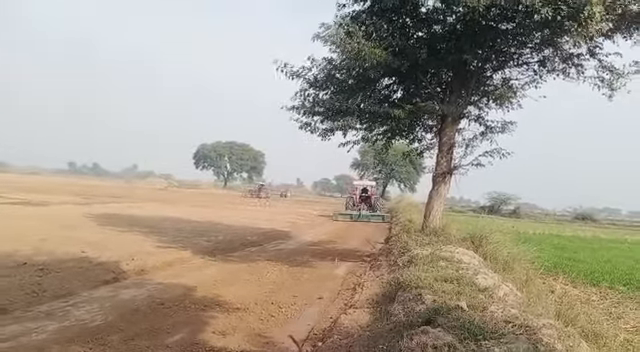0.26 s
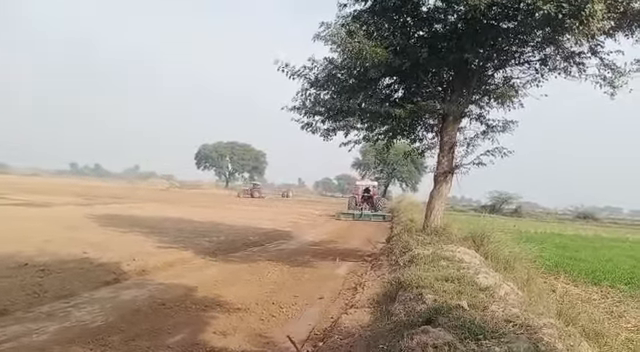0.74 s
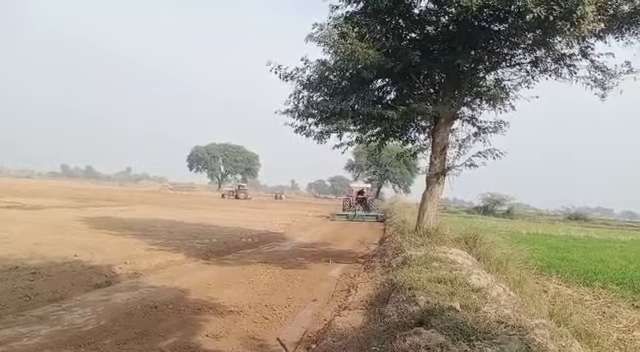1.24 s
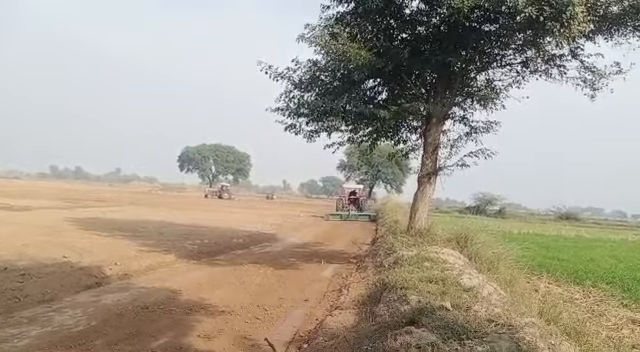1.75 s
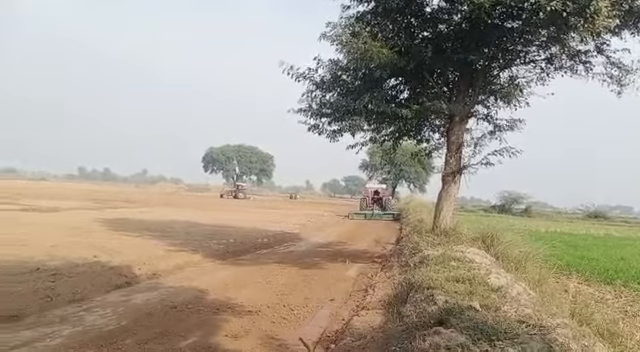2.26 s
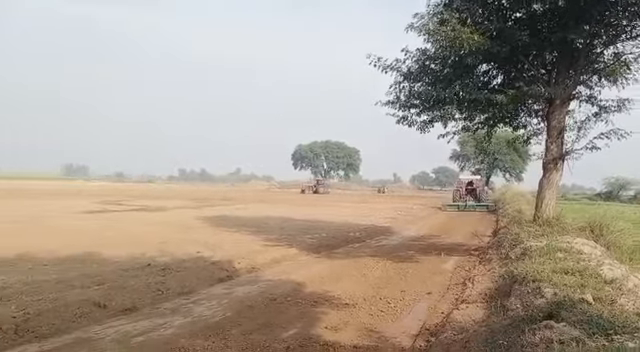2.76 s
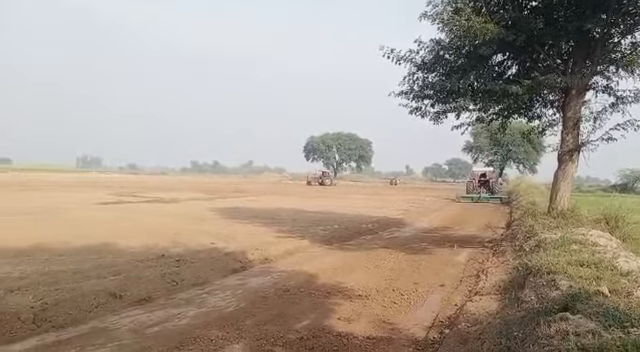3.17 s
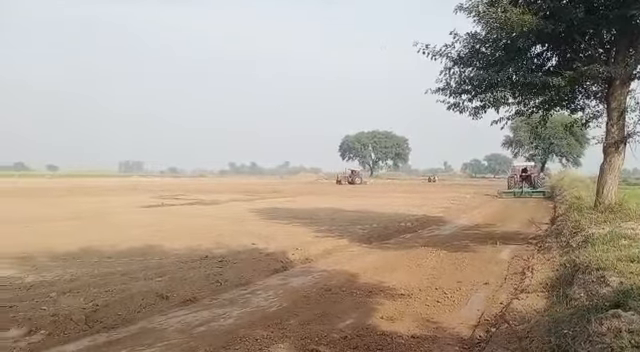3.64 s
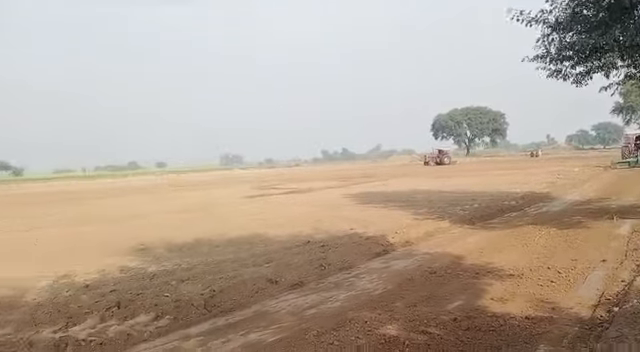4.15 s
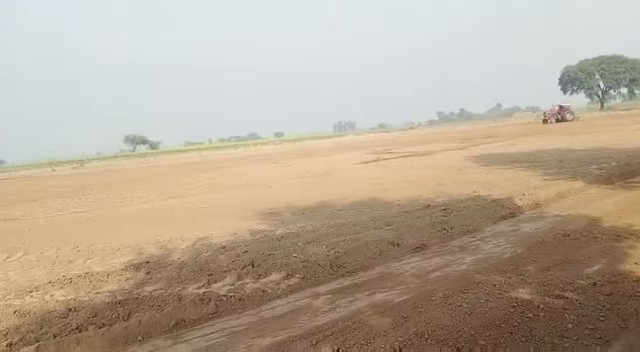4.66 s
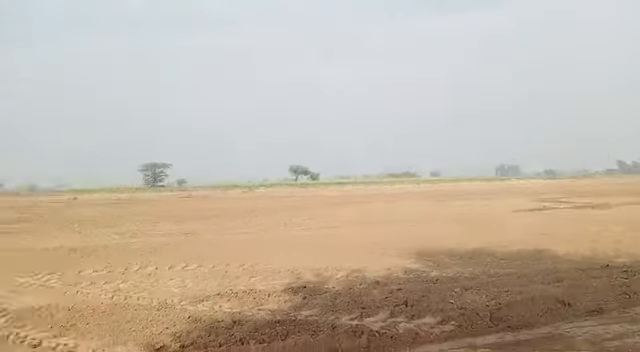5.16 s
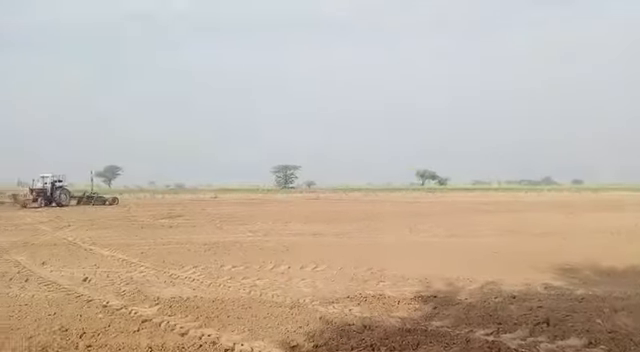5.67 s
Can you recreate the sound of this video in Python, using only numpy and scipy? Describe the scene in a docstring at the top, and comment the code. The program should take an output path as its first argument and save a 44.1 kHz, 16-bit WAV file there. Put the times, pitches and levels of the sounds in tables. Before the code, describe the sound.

Wind gusts thump the microphone over the metallic knocking of a distant diesel tractor, which slows and turns hollow.

```python
"""A four-cylinder diesel tractor drags a leveller over a dry field, some way off. From the start each
firing excites a burst of metallic noise; the hardest knocks stand out, with an occasional clank, and
gusts buffet and thump the microphone. After two seconds the engine throttles back; then the microphone
swings away and the clatter's colour slides down. Near 3.5 s the wind thumps again, and by 5 s the
engine is heard mostly from the side, slower and hollow, over the even hush of the field."""
import sys
import numpy as np
from scipy import signal
from scipy.fft import rfft, irfft, next_fast_len
from scipy.io import wavfile
from scipy.ndimage import uniform_filter1d

SR = 44100
rng = np.random.default_rng(int(sys.argv[2]) if len(sys.argv) > 2 else 0)


def master(y):
    """Save y as 16-bit WAV."""
    cut = np.clip(np.atleast_2d(y).T, -1, 1)
    pcm = np.round(cut * 32767)  # scale
    wavfile.write(sys.argv[1], SR, pcm.astype(np.int16))


N = 260631
TIME = np.arange(N) / SR

# balance of the engine's voices: t/s, share under load (0-1), share heard from the side (0-1)
ENGINE_STATE = [(0, 0.79, 0.24), (2.15, 0.66, 0), (2.65, 0, 0.03), (3.5, 0.23, 0.26), (4.1, 0.05, 0.49),
                (4.8, 0.1, 0.81), (5.91, 0.4, 0.8)]
# spectrum of the block under load: f/Hz, relative level/dB
LOADED_SPECTRUM = [(500, -43.5), (900, -20.5), (1130, -24), (1330, -4), (1600, -3), (2100, -2.5),
                   (2320, -13), (2480, -4), (2660, -1), (2880, -3.5), (3130, -17.5), (3480, -2),
                   (3750, -14), (4300, -51)]
# slide of the clatter's colour as the microphone turns: t/s, shift/octaves
COLOUR_SLIDE = [(2.3, 0.52), (3.5, 0.26), (4.2, 0.11), (4.7, 0.013), (5.2, -0.1), (5.6, -0.29),
                (5.91, -0.31)]


def clatter(firings):
    """Forced vibration: the firings shake the block, the loose tinwork and the injectors."""
    # t/s, knock level/dB, rattle level/dB, injector tick level/dB
    levels = [(0.0, -32, -45, -46.5), (0.49, -35.5, -52, -47.5), (0.92, -34.5, -43, -43.5),
              (1.6, -37, -46, -44.5), (2.0, -38, -44, -42), (2.4, -37.5, -49, -48),
              (2.75, -40, -53.5, -49.5), (2.97, -41.5, -54, -52.5), (3.1, -41, -60, -52),
              (3.36, -40.5, -57, -54.5), (3.48, -40.5, -50, -51), (3.93, -42, -60.5, -50.5),
              (4.28, -39, -58, -47.5), (4.42, -40, -61, -46), (4.8, -38.5, -51, -45),
              (5.15, -44, -45.5, -46), (5.51, -47.5, -58, -45.5), (5.91, -45.5, -54.5, -48)]
    # swells and lulls of the knock: middle t/s, duration/s, gain/dB
    surges = [(0.156, 0.37, -2.5), (0.703, 0.16, -1), (1.236, .3, 0.5), (2, 0.2, 2), (2.588, 0.032, -6),
              (2.79, 0.054, 1.5), (3.26, 0.19, -1), (3.494, .1, 2.5), (4.27, 0.067, 2), (4.7, 0.064, 1),
              (5.1, 0.45, 2), (5.418, 0.046, 2.5), (5.67, 0.061, 1)]
    # spectra of tinwork and injectors: f/Hz, relative level/dB
    rattle_spectrum = [(2800, -29.5), (3500, -44.5), (3850, 3), (4350, 6), (4750, 3), (5100, 4),
                       (5600, -11), (6500, -59.5)]
    tick_spectrum = [(4300, -22), (5150, -5.5), (5450, 3.5), (6100, 2.5), (6600, 4), (6950, 1.5),
                     (7300, -7), (7700, -3), (8100, -16.5), (8600, -32), (9000, -65)]
    knock_db, rattle_db, tick_db = in_time(levels)
    surge_db = sum(db * swell(t, length) for t, length, db in surges)
    beat = firing_envelope(firings, rise=.15, fall=.21, jitter=.022, whirr_db=-6.5, uneven_db=.6)
    knock = from_db(knock_db + surge_db) * block_knock(firings, beat)
    buzz = unit_rms(beat ** 0.95)    # loose parts go on buzzing between firings
    rattle = coloured(buzz * vibration(firings, repeat=0.06, flutter_db=1.0), rattle_spectrum)
    tick = coloured(buzz * vibration(firings, repeat=0.05, flutter_db=1.0), tick_spectrum)
    turning = np.interp(TIME, [2.2, 3.3], [0, 1])    # the treble starts to swirl with the turn
    rattle = swirl(from_db(rattle_db) * rattle, strength=1.6 * turning)
    tick = swirl(from_db(tick_db) * tick, strength=.7 * turning)
    return knock + rattle + tick


def block_knock(firings, beat):
    """Incoherent sources add in power: the block's voices are blended by load and by direction."""
    # spectrum of the block running light: f/Hz, relative level/dB
    light_spectrum = [(600, -35.5), (1080, -16.5), (1280, -6.5), (1450, -11), (1630, 8.5), (1850, -4.5),
                      (2200, 8), (2700, 5), (3200, 3), (3500, -6), (3900, -2), (4300, -34)]
    load, aside = in_time(ENGINE_STATE)
    struck = coloured(block_modes(firings, uneven_db=1.6, scatter_s=.0005), LOADED_SPECTRUM)
    shaken = coloured(beat * vibration(firings, repeat=0.08, flutter_db=1.0), LOADED_SPECTRUM)
    labouring = unit_rms(shaken + from_db(-1) * struck)
    softened = beat ** 0.75    # with the fuel cut back the firings stand out less
    coasting = coloured(softened * vibration(firings, repeat=0.14, flutter_db=1.7), light_spectrum)
    coasting = swirl(coasting, strength=.5)
    ahead = np.sqrt(load) * labouring + np.sqrt(1 - load) * coasting
    return np.sqrt(1 - aside) * ahead + np.sqrt(aside) * side_clatter(firings, beat)


def firing_envelope(firings, rise, fall, jitter, whirr_db, uneven_db):
    """Amplitude modulation: a burst per firing over the whirr of gears; times are in firing periods."""
    # cylinders in firing order: gain/dB weighted more under load, gain/dB weighted more running light
    cylinders = [(-2, -1.5), (-0.5, -2.5), (1.5, -2.5), (0.5, -1.5)]
    load, _ = in_time(ENGINE_STATE)
    count = np.round(firings).astype(int)
    force, timing = rng.standard_normal((512, 2))[count].T
    since = firings - count + jitter * timing
    loaded_db, light_db = np.array(cylinders)[count % len(cylinders)].T
    strength = from_db(load * loaded_db + (2.5 - load) * light_db + uneven_db * force)
    burst = strength * np.exp(-np.where(since < 0, -since / rise, since / fall))
    return unit_rms(np.hypot(burst, from_db(whirr_db)))


def vibration(firings, repeat, flutter_db):
    """Partial coherence: the share `repeat` of the power recurs at every firing, the rest is random."""
    count = np.round(firings).astype(int)
    age = np.arange(N) - np.searchsorted(count, count)    # samples into this firing
    pattern = rng.standard_normal(2048)
    shaking = np.sqrt(repeat) * pattern[age] + np.sqrt(1 - repeat) * rng.standard_normal(N)
    return shaking * from_db(flutter_db * drift(90))


def block_modes(firings, uneven_db, scatter_s):
    """Impulse response: each firing strikes the block's modes, which ring as damped sinusoids."""
    # f/Hz, relative level/dB, t60/s
    modes = [(1360, -3, 0.012), (2146, -7, 0.056), (2457, 7, 0.046), (2622, 1, 0.056), (2727, 0.5, 0.051),
             (3470, -7.5, 0.036)]
    starts = np.flatnonzero(np.diff(np.floor(firings)))
    out = 0
    for hz, db, t60 in modes:
        late, strength = rng.standard_normal((2, 512))[:, :len(starts)]
        strikes = np.clip(starts + (late * scatter_s * SR).astype(int), 0, N - 1)
        impulses = np.full(N, 1e-18)
        impulses[strikes] = from_db(db + uneven_db * strength)
        r, w = from_db(-60 / (t60 * SR)), 2 * np.pi * hz / SR
        out = out + signal.lfilter([0, np.sin(w)], [1, -2 * r * np.cos(w), r * r], impulses)
    return out


def side_clatter(firings, beat):
    """Directivity: from the side, separate peaks slide down through the engine's steady spectrum."""
    # f/Hz at zero slide, bandwidth/Hz, relative level/dB, octaves per octave of slide
    peaks = [(1034, 100, -2.5, 1.3), (1500, 303, 1, 1.046), (2064, 370, -1.5, 1.2), (2400, 400, 2.5, 1.5),
             (2810, 610, -2, 1.5), (3710, 330, 2.5, 1.59), (4870, 260, -11.5, 1.3)]
    # f/Hz, relative level/dB
    side_spectrum = [(700, -20), (1130, -12), (1290, 0), (2600, 0), (3100, -1.5), (3400, -12), (4300, -11),
                     (5200, -18)]
    slide, = in_time(COLOUR_SLIDE)
    out = 0
    for rest_hz, width, db, follows in peaks:
        hz = rest_hz * 2 ** (follows * slide)
        shaking = beat * vibration(firings, repeat=0.027, flutter_db=2.0)
        peak = resonance(resonance(shaking, hz, width), hz, width)
        out = out + from_db(db + 2 * drift(9)) * peak
    return coloured(out, side_spectrum)


def exhaust(firings, waver_db):
    """Periodic gas pulses drone at harmonics of the firing rate, louder under load, wavering in wind."""
    # multiple of the firing rate, relative level/dB
    harmonics = [(2, -61.5), (3, -61), (4, -60.5), (5, -74)]
    load, _ = in_time(ENGINE_STATE)
    drone = sum(from_db(db + waver_db * drift(6.1)) * np.sin(2 * np.pi * k * firings)
                for k, db in harmonics)
    return np.sqrt(2) * drone * from_db(-7 * (1.5 - load))


def hard_knocks(t60, width_hz, crack_db, gain_db):
    """Damped transients: the engine's hardest knocks, with an occasional metallic clank."""
    # t/s, relative level/dB, ringing f/Hz
    knocks = [(0.1431, -21.5, 2600), (0.5796, -29, 2580), (1.0136, -23.5, 2600), (1.3154, -27, 2390),
              (1.3334, -23, 2760), (1.5204, -23.5, 2650), (1.7794, -21.5, 2000), (1.8552, -24, 2560),
              (2.0023, -29, 2670), (2.0393, -33, 2390), (2.7994, -31, 1480), (2.8664, -31.5, 2380),
              (3.051, -26.5, 2170), (3.4974, -37, 1590), (4.1969, -27, 2300), (4.2892, -27, 2350),
              (4.4742, -26, 2455), (4.569, -27.5, 2350), (4.8559, -23, 2460), (5.0444, -36, 2210),
              (5.4234, -34, 2870)]
    out, age = np.zeros(N + SR), TIME[:SR // 8]
    crack = from_db(crack_db) * coloured(rng.standard_normal(N), LOADED_SPECTRUM)
    for t, db, hz in knocks:
        span = round(t * SR) + np.arange(len(age))
        band = signal.butter(2, [hz - width_hz / 2, hz + width_hz / 2], "band", fs=SR, output="sos")
        ring = unit_rms(signal.sosfilt(band, rng.standard_normal(len(age))))
        out[span] += from_db(db + gain_db - 60 * age / t60) * (ring + crack[span])
    return signal.sosfilt(signal.butter(6, 4500, fs=SR, output="sos"), out[:N] + 1e-18)


def swirl(x, strength, count=10):
    """Multipath interference: moving air over the warm field opens and closes slightly longer paths."""
    lags_s = rng.uniform(.0006, .005, count)
    paths = sum(drift(7) * np.pad(x, (round(lag * SR), 0))[:N] for lag in lags_s) / np.sqrt(count)
    return (x + strength * paths) / np.sqrt(1 + strength ** 2)


def reflection(x, gain_db):
    """Comb filtering: a nearby surface sends the sound back a moment later."""
    # t/s, delay/ms, relative amplitude
    echo = [(0, 1.17, 0.13), (2.2, 1.84, 0), (2.8, 1.47, 0.08), (3.2, 1.58, 0.3), (3.85, 2.12, 0.28),
            (4.75, 1.98, 0.04), (5.3, 2.5, 0.13), (5.91, 2.56, 0.24)]
    delay_ms, strength = in_time(echo)
    return x + from_db(gain_db) * strength * np.interp(TIME - delay_ms / 1000, TIME, x)


def hollows(x):
    """Time-varying filtering: hollows and ridges open and close in the clatter, many sliding down.
    The top treble dulls at the start, briefly near 2.5 s, and at the end."""
    # strongest at t/s, duration/s, f/Hz then, bandwidth/Hz, gain/dB, octaves per octave of slide
    bands = [(0.29, 3.5, 3020, 230, -7, 0.17), (0.31, 2.5, 7750, 1180, -36, 0.18),
             (1.1, 1.7, 9600, 1400, -22.5, 0), (0.403, 6.3, 4990, 340, -3, 2.3),
             (2.54, 0.62, 7550, 1200, -22, 1.6), (2, 1.8, 1610, 160, -7, 1.2),
             (2.65, 0.49, 4630, 290, -9.5, 0.84), (3.14, 0.29, 4070, 150, -17, 0.14),
             (3.19, 0.24, 3650, 150, 11.5, 0.3), (3.5, 0.13, 4300, 300, 4.5, 0.6),
             (3.56, 0.46, 4650, 264, -5, 0.04), (3.705, 0.91, 4980, 200, -16.5, 0),
             (4.07, 0.99, 3980, 151, -34, 1.06), (3.7, 0.35, 3880, 280, 9, 0.35),
             (3.94, 0.56, 4500, 200, -26, 1.4), (4.34, 0.81, 3450, 370, -23.5, 1.3),
             (4.293, 0.89, 1950, 150, -9, 1.8), (4.96, 0.54, 2760, 320, -24.5, 0.43),
             (5.1, 0.6, 1800, 140, -5.5, 1.5), (4.83, 0.64, 4000, 490, -11, 0.56),
             (5.05, 0.67, 3370, 240, -14, 0.75), (5.27, 0.56, 2977, 106, 13, 0.6),
             (5.68, 0.18, 1780, 140, 7, 0.31), (5.7, 0.6, 3420, 390, -10.5, 0.52),
             (5.745, 0.64, 3200, 290, 4.5, 0.45), (5.87, 0.59, 1490, 140, -19.5, 0.13),
             (5.88, 0.4, 2100, 240, -25, 0.24), (5.803, 0.21, 2840, 510, -25, 0),
             (5.9, 1.34, 7960, 1200, -21, 0.022)]
    slide, = in_time(COLOUR_SLIDE)
    for t, length, hz, width, db, follows in bands:
        centre = hz * 2 ** (follows * (slide - np.interp(t, TIME, slide)))
        cut = 1 - from_db(db / 2 * swell(t, length))
        for _ in range(2):    # two passes, half the decibels each
            x = x - cut * resonance(x, centre, width)
    return x


def wind(gain_db, lump_db):
    """Turbulence at the microphone port: gusts over a breeze, the larger eddies rumbling lower."""
    # start t/s, duration/s, relative level/dB of large, middling and small eddies
    gusts = [(0.013, 0.101, -30.0, -35, -36), (0.144, 0.099, -29.5, -34, -31.5),
             (0.279, 0.11, -37.5, -33.5, -36), (0.444, 0.073, -32.5, -29, -38.5),
             (0.536, 0.078, -40.5, -36.5, -37.0), (0.62, 0.031, -35, -48, -49.5),
             (0.772, 0.1, -48, -41.5, -45.5), (0.9, 0.037, -51, -42.5, -65.5),
             (1.193, 0.015, -63, -42, -49), (1.276, 0.036, -44, -39.5, -64),
             (1.39, 0.025, -63.5, -69.0, -43), (1.577, 0.032, -70.5, -54, -38),
             (1.665, 0.058, -51.5, -43.0, -67), (1.795, 0.039, -49.5, -49, -41.0),
             (1.857, 0.016, -44, -47.0, -44), (2.094, 0.118, -46.5, -47, -44.5),
             (2.31, 0.031, -70, -47, -47), (2.438, 0.069, -49, -56, -42.0), (2.529, 0.064, -61, -58, -37.5),
             (2.611, 0.05, -44, -61.5, -53), (2.694, 0.11, -41.5, -38, -41),
             (2.768, 0.056, -40, -46, -39.5), (2.867, 0.095, -43, -43, -41),
             (3.086, 0.024, -40, -52, -41.5), (3.204, 0.0023, -53.0, -50, -45),
             (3.346, 0.12, -32.5, -40.0, -48.5), (3.486, 0.07, -28, -31, -36.5),
             (3.583, 0.0095, -33, -31.5, -41.5), (3.641, 0.081, -37.0, -46, -53.5),
             (3.736, 0.056, -35.5, -40.5, -45.5), (3.82, 0.043, -38, -46, -46.5),
             (3.97, 0.16, -38.5, -45, -48), (4.111, 0.077, -45, -50, -43), (4.205, 0.088, -57.0, -54, -46),
             (4.489, 0.1, -44.5, -70, -73), (4.719, 0.032, -46.5, -68.0, -76),
             (4.887, 0.044, -42.5, -49.5, -48.5), (4.964, 0.1, -44.5, -55, -48.5),
             (5.128, 0.11, -49, -69.5, -47.5), (5.433, 0.021, -45, -49, -52),
             (5.675, 0.067, -35, -44.5, -45)]
    # spectra of the three eddy sizes: f/Hz, relative level/dB
    large = [(20, -45.5), (45, -25.5), (68, -2), (110, -1), (135, -10.5), (175, -24)]
    middling = [(90, -21.5), (130, 0), (180, 0), (240, -22.5)]
    small = [(140, -22), (195, 2), (230, 1.5), (270, -8.5), (320, -22), (430, -42.5), (600, -46)]
    breeze_db = (-54.5, -61.5, -56)
    gust_powers = burst_powers(gusts, attack_s=0.016, release_s=0.011)
    out = 0
    for spectrum, power, db in zip((large, middling, small), gust_powers, breeze_db):
        flow = coloured(rng.standard_normal(N), spectrum)
        flow /= np.sqrt(uniform_filter1d(flow ** 2, size=1800) + 1e-6)    # even out the level
        strength = np.sqrt(power + from_db(db) ** 2)
        out = out + strength * from_db(lump_db * drift(45)) * flow
    return from_db(gain_db) * out


def thumps(rise_s, gain_db):
    """Damped oscillation: the hardest puffs make the microphone port boom for a few cycles."""
    # t/s, relative level/dB, f/Hz, t60/s
    puffs = [(0.022, -8.5, 112, 0.037), (0.099, -4, 101, 0.037), (0.193, -7.5, 179.5, 0.079),
             (0.198, -11.5, 343, 0.028), (0.216, -19, 408, 0.04), (0.247, -28, 446, 0.061),
             (0.352, -11, 149, 0.051), (3.357, -15.5, 118.8, 0.15), (3.491, -18.5, 158, 0.13),
             (3.524, -25.5, 287, 0.11), (3.986, -11.5, 121, 0.047), (5.738, -15.5, 101, 0.053)]
    out = np.zeros(N)
    for t, db, hz, t60 in puffs:
        age = np.maximum(TIME - t, 0)
        onset = 1 - np.exp(-(age / rise_s) ** 2)
        decay = from_db(db + gain_db - np.minimum(60 * age / t60, 200))
        out += onset * decay * np.sin(2 * np.pi * hz * age)
    return out


def hums(width_hz):
    """Narrow-band noise is heard as pitch: faint hums swell and fade under the clatter."""
    # middle t/s, duration/s, f/Hz, level/dB
    tones = [(1.2, 0.88, 430, -71), (0.37, 1.8, 660, -72.5), (3.67, 1.13, 640, -70), (5.65, 0.14, 345, -52),
             (5.57, 0.13, 750, -60), (3.8, .07, 1150, -51.5), (4.8, .05, 1170, -50.5), (4.8, .1, 1010, -59)]
    out = 0
    for t, length, hz, db in tones:
        tone = rng.standard_normal(N)
        for _ in range(2):
            tone = resonance(tone, np.full(N, hz), width_hz, block=N)
        out = out + from_db(db) * swell(t, length) * unit_rms(tone)
    return out


def squeaks(length_s, attack_s, release_s):
    """Tone bursts: brief, very high sinusoids are heard as tiny squeaks."""
    # t/s, f/Hz, peak level/dB
    tones = [(3.74, 10200, -76), (3.96, 11000, -73), (4.26, 9700, -68), (4.435, 10450, -78)]
    return sum(from_db(db) * held(t, length_s, attack_s, release_s) * np.sin(2 * np.pi * hz * TIME)
               for t, hz, db in tones)


def background(field_db, rustle_db):
    """Broadband noise: the steady hush of the field, and modulated rustles in the top treble."""
    # start t/s, duration/s, relative level/dB near 15 kHz, relative level/dB near 8-11 kHz
    rustles = [(.27, 0.017, -80, -101), (.95, 0.11, -78, -99), (1.2, 0.2, -86, -99), (2.8, 0.27, -80, -89),
               (3.09, 0.14, -71.5, -84), (3.36, 0.14, -82.5, -86), (3.68, 0.073, -76, -77),
               (3.85, 0.21, -88, -86), (4.14, 0.17, -81, -78), (4.33, 0.27, -92, -81)]
    # spectra of the open field with far machines and of both rustle bands: f/Hz, relative level/dB
    field_spectrum = [(25, 13.5), (100, -13.5), (300, 4.5), (440, 5), (540, -3), (640, -0.5), (760, 0.5),
                      (1100, -0.5), (3000, -18.5), (7500, -26), (9000, -50.5), (13000, -46), (15800, -44)]
    upper_spectrum = [(7000, -39.5), (9500, -29.5), (10900, -14.5), (11800, -15.5), (13700, -9),
                      (14400, -6), (15100, 1.5), (15800, 2.5)]
    lower_spectrum = [(7000, -7.5), (8400, 12.5), (9300, -6), (10200, -5.5), (10900, 2), (11400, -15),
                      (14000, -8.5)]
    upper_power, lower_power = burst_powers(rustles, attack_s=0.05, release_s=0.06)
    floor_power = from_db(-87.5) ** 2
    upper = np.sqrt(upper_power + floor_power) * coloured(rng.standard_normal(N), upper_spectrum)
    lower = np.sqrt(lower_power) * coloured(rng.standard_normal(N), lower_spectrum)
    flicker = from_db(rustle_db + 2.5 * drift(120))
    hush = from_db(field_db) * coloured(rng.standard_normal(N), field_spectrum)
    return hush + flicker * (upper + lower)


def coloured(x, spectrum):
    """Minimum-phase (causal) filtering by a spectrum of f/Hz, level/dB; the result has rms 1."""
    size = 2 * next_fast_len(N // 2 + 8192)
    hz, db = np.transpose(spectrum)
    hz, db = np.append(hz, 2 * hz[-1]), np.append(db, db[-1] - 60)    # roll off above the last point
    octaves = np.log2(np.maximum(np.fft.rfftfreq(size, 1 / SR), 1))
    cepstrum = irfft(np.log(from_db(np.interp(octaves, np.log2(hz), db))))
    cepstrum[1:size // 2] *= 2    # fold onto positive time
    cepstrum[size // 2 + 1:] = 0
    return unit_rms(irfft(rfft(x, size) * np.exp(rfft(cepstrum)))[:N])


def resonance(x, hz, width_hz, block=256):
    """A two-pole resonator with peak gain 1, retuned block by block."""
    out, state = np.zeros(N), np.zeros(2)
    r = np.exp(-np.pi * width_hz / SR)
    g = (1 - r * r) / 2
    for i in range(0, N, block):
        poles = [1, -(1 + r * r) * np.cos(2 * np.pi * hz[i] / SR), r * r]
        out[i:i + block], state = signal.lfilter([g, 0, -g], poles, x[i:i + block], zi=state)
    return out


def drift(per_s):
    """A random fluctuation of rms 1 through per_s new values a second."""
    knots = rng.standard_normal(4096)
    return unit_rms(np.interp(TIME * per_s, np.arange(len(knots)), knots))


def swell(t, length):
    """A Gaussian envelope, 1 at time t."""
    return np.exp(-np.minimum((2 * (TIME - t) / length) ** 2, 50))


def held(start, length, attack_s, release_s):
    """An envelope that rises until start, holds for length and decays exponentially."""
    early, late = np.maximum(start - TIME, 0), np.maximum(TIME - start - length, 0)
    return np.exp(-np.minimum((early / attack_s) ** 2 + late / release_s, 50))


def burst_powers(rows, attack_s, release_s):
    """Power summation of held bursts: one curve for each level column."""
    return sum(from_db(levels)[:, None] ** 2 * held(t, length, attack_s, release_s) ** 2
               for t, length, *levels in rows)


def in_time(rows):
    """Linear interpolation of each column against the first, t/s."""
    t, *columns = np.transpose(rows)
    return [np.interp(TIME, t, column) for column in columns]


def from_db(db):
    """Decibels to amplitude ratio."""
    return 10 ** (np.asarray(db) / 20)


def unit_rms(x):
    """Normalisation to rms 1."""
    return x / np.sqrt(np.mean(x ** 2) + 1e-20)


def scene():
    """Superposition of tractor, wind and field at one microphone."""
    # t/s, firing rate f/Hz
    engine_speed = [(0.0, 52.51), (1.77, 53.66), (2.07, 54.82), (2.85, 49.37), (3.42, 43.16), (3.81, 43.41),
                    (4.14, 41.91), (4.35, 43.45), (4.74, 40.83), (4.95, 43.12), (5.91, 41.53)]
    firing_hz, = in_time(engine_speed)
    firings = .42 + np.cumsum(firing_hz) / SR    # phase, one cycle per firing
    metal = clatter(firings) + hard_knocks(t60=0.061, width_hz=410, crack_db=-8, gain_db=-6)
    metal = reflection(swirl(metal, strength=.3), gain_db=-1.0)
    tractor = hollows(metal) + exhaust(firings, waver_db=6.0)
    air = wind(gain_db=-0.48, lump_db=1.67) + thumps(rise_s=0.0031, gain_db=0.5)
    faint = hums(width_hz=45) + squeaks(length_s=0.012, attack_s=.006, release_s=.015)
    return (tractor + air + faint + background(field_db=-63.5, rustle_db=4.5))[None]


def record(dry):
    """Band limiting: the microphone loses the deepest bass, and the top is cut steeply."""
    bass_cut = signal.butter(3, 35.4, "high", fs=SR, output="sos")
    top_cut = signal.ellip(10, .1, 80, 15850, fs=SR, output="sos")
    return signal.sosfilt(top_cut, signal.sosfilt(bass_cut, dry))


dry = scene()
out = record(dry)
master(out)
```